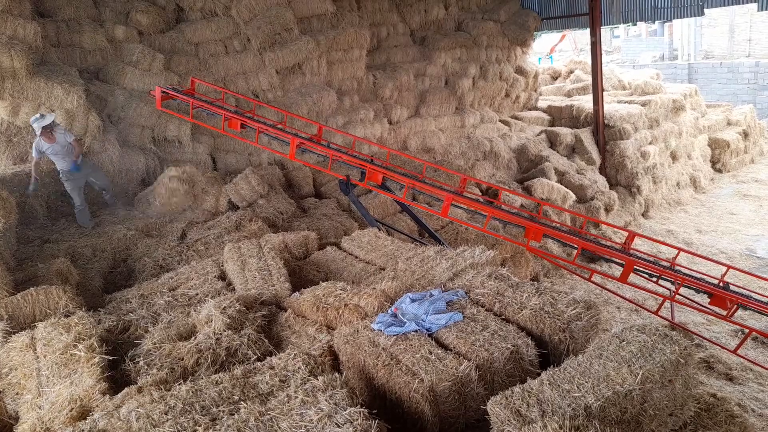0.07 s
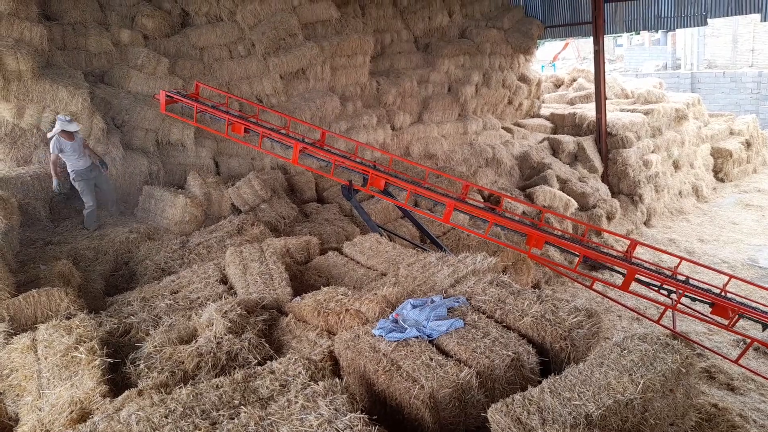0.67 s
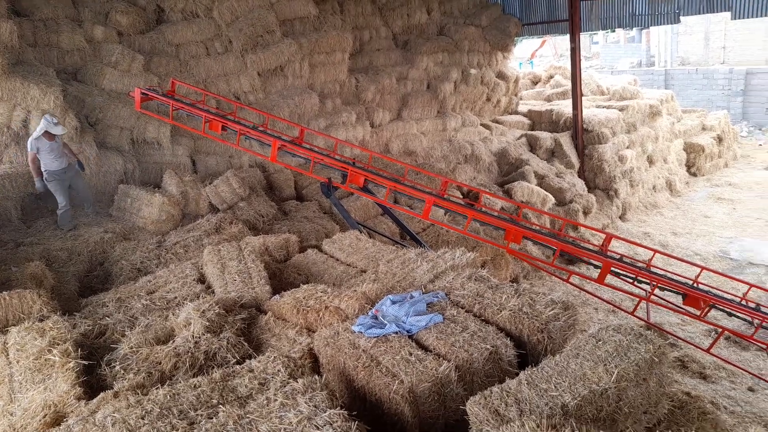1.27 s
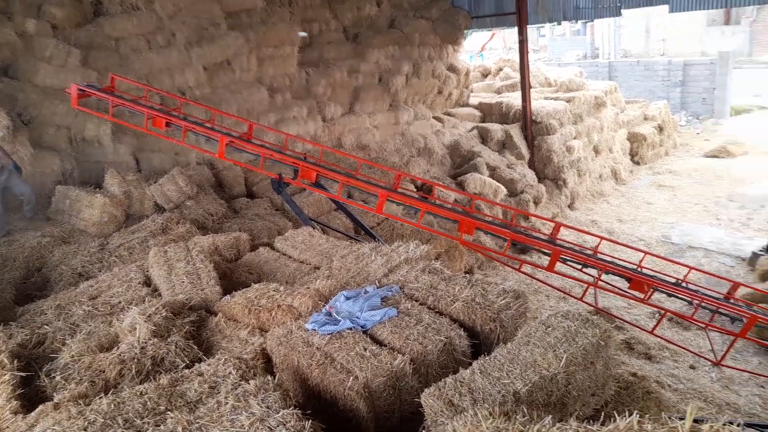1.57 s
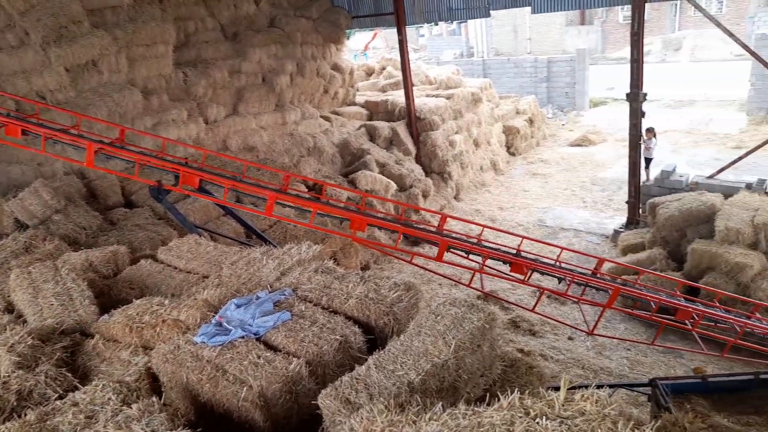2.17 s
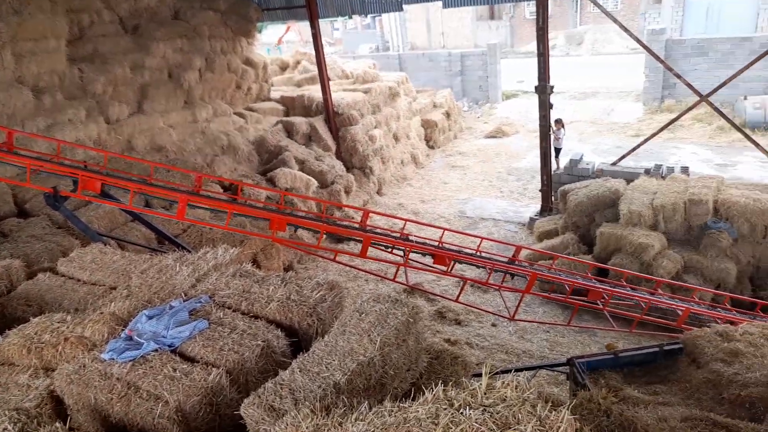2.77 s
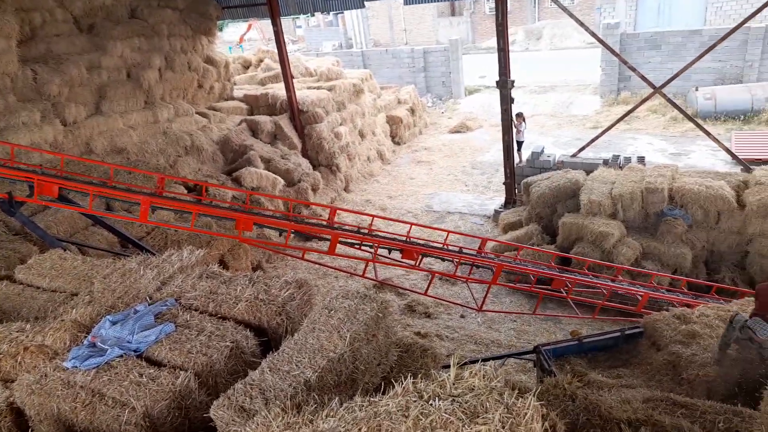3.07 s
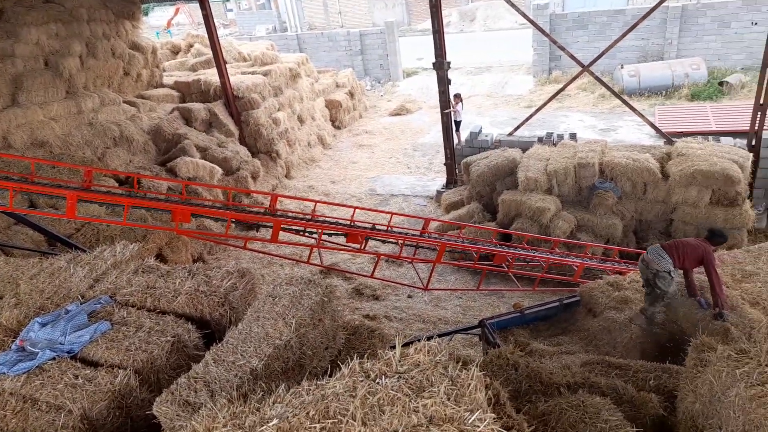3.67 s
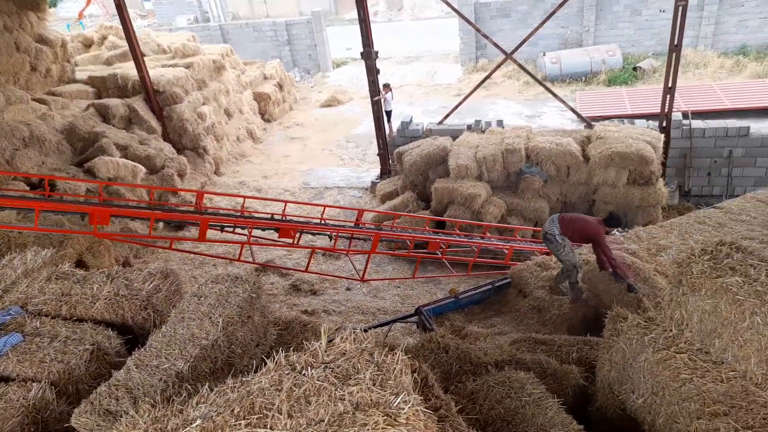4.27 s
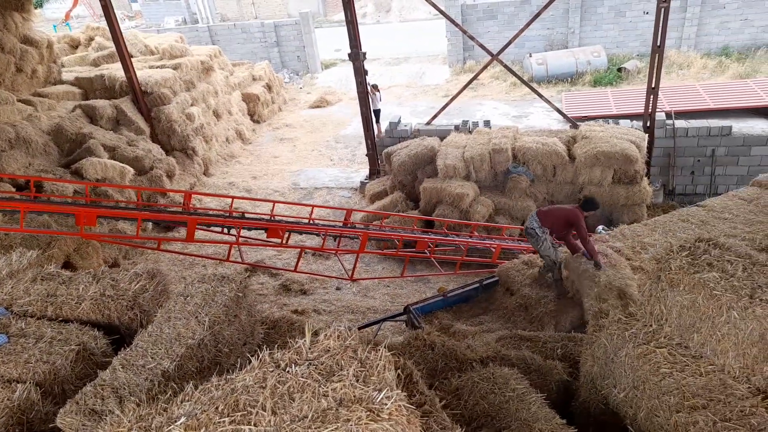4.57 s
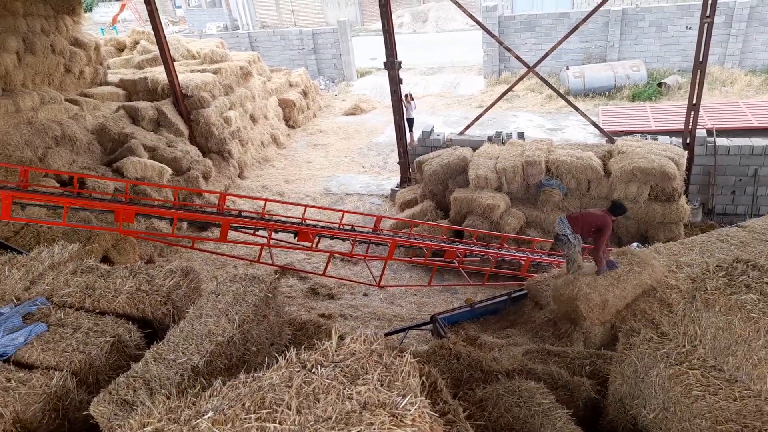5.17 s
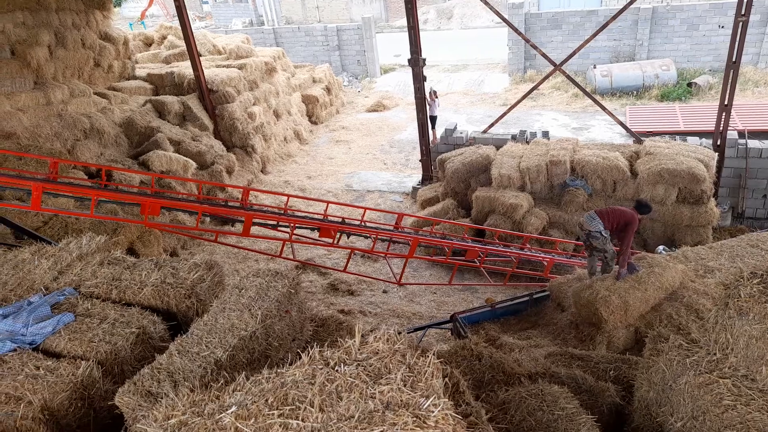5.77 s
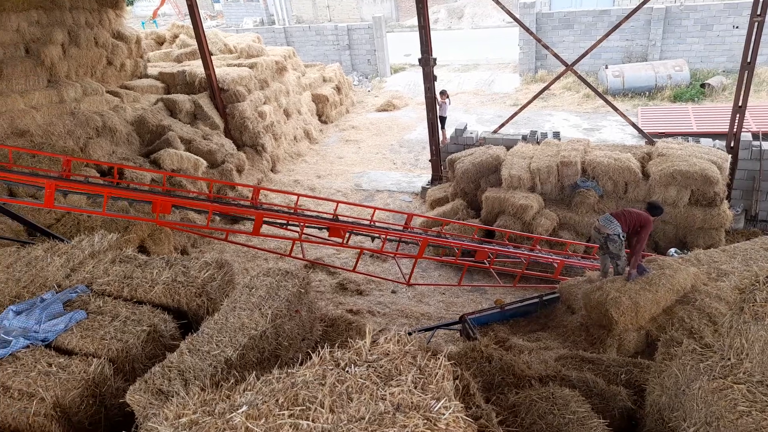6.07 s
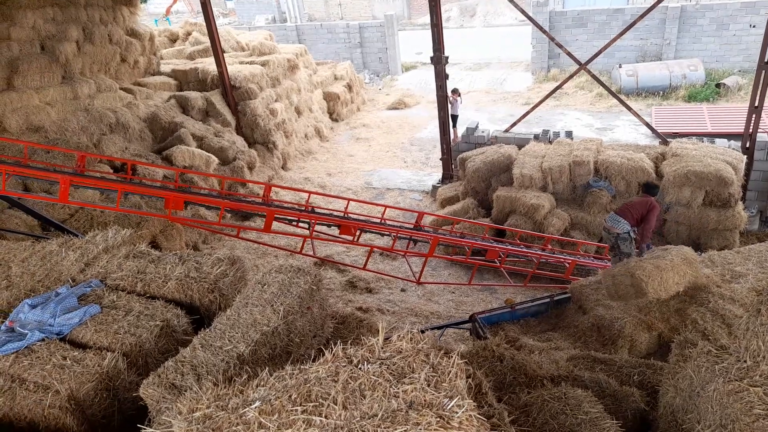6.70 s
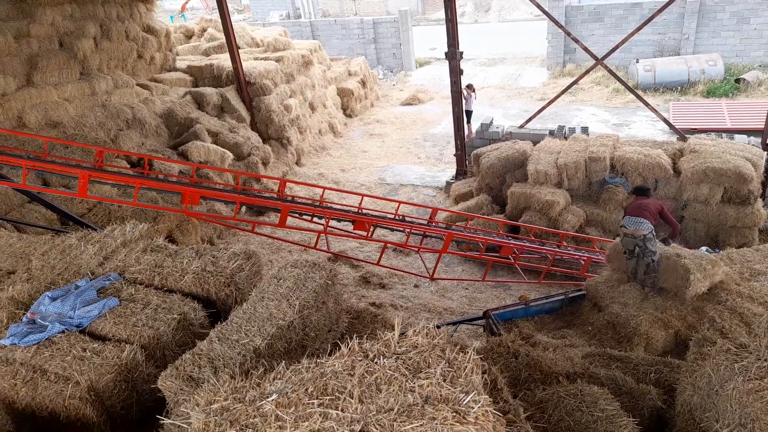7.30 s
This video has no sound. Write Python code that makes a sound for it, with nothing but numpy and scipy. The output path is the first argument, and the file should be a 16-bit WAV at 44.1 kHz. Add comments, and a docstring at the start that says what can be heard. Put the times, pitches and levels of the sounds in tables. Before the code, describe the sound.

Rapid steel chain rattle, hollow knocks and bright clinks from a running hay conveyor, over a steady motor hum.

```python
"""A chain bale conveyor runs in an open hay barn, heard from the stack; its drive lies to the right.
From the start the motor hums, the chain rattles in its trough and passing flights ring the rails;
each link lands on the sprocket and rebounds, so the hollow frame knocks and the steel rollers clink.
Over the first 3 s the microphone turns towards the drive; near 2 s straw rustles and a draught gusts.
A low rumble swells past 4 s, and from 5.6 s straw rustles again among the loudest pings of the pins."""
import sys
import numpy as np
from scipy import signal
from scipy.fft import rfft, irfft
from scipy.io import wavfile
from scipy.ndimage import uniform_filter1d

SR = 44100
rng = np.random.default_rng(int(sys.argv[2]) if len(sys.argv) > 2 else 0)


def put_to_file(sound):
    """Save the sound as 16-bit audio at rate SR, in the file named by the first command-line argument."""
    columns = np.atleast_2d(sound).T  # one column per channel
    safe = np.clip(columns, -1, 1)
    whole_steps = np.round(safe * 32767)
    wavfile.write(sys.argv[1], SR, whole_steps.astype(np.int16))


N = 328104
T, FREQS = np.arange(N) / SR, np.fft.rfftfreq(N, 1 / SR)
LINK_HZ, TEETH = 17.8, 6


def amp(db):
    """Decibels to amplitude ratio."""
    return 10 ** (np.asarray(db) / 20)


def unit(x):
    """Normalisation to rms 1."""
    return x / np.sqrt(np.mean(x ** 2) + 1e-20)


def curve(rows, t=T, column=1):
    """Linear interpolation of a table column in time."""
    rows = np.asarray(rows)
    return np.interp(t, rows[:, 0], rows[:, column])


def spectrum(points):
    """Interpolation of levels on a log-frequency axis."""
    hz, db = np.transpose(points)
    return np.interp(np.log(FREQS + 1), np.log(hz + 1), db)


def colour(x, points, ripple_db=0):
    """Spectral shaping; the ripple stands for many small fixed resonances."""
    ripple = unit(uniform_filter1d(rng.standard_normal(len(FREQS)), size=500))
    return irfft(rfft(x) * amp(spectrum(points) + ripple_db * ripple), N)


def drift(hz):
    """Random modulation: low-passed noise of rms 1."""
    return unit(irfft(rfft(rng.standard_normal(N)) / (1 + (FREQS / hz) ** 4), N))


def noise_pair(correlation):
    """Partial coherence: white noise at two microphones."""
    a, b = rng.standard_normal((2, N))
    return np.array([a, correlation * a + np.sqrt(1 - correlation ** 2) * b])


def add(mix, s, sound):
    """Superposition of a sound starting at s seconds."""
    part = mix[..., max(round(s * SR), 0):][..., :sound.shape[-1]]
    part += sound[..., :part.shape[-1]]


def resonant(modes, correlation):
    """Forced vibration: noise drives a set of modes."""
    power = sum(amp(db) ** 2 / width / (1 + ((FREQS - hz) / width) ** 2) ** 2 for hz, width, db in modes)
    return unit(irfft(rfft(noise_pair(correlation)) * np.sqrt(power), N))


def strike(modes, t, detune):
    """Free vibration: damped modes, tuned and balanced a little differently at each blow."""
    hz, width, db = np.transpose(modes)[:, :, None]
    mistuning, share = rng.standard_normal((2, len(modes), 1))
    phase = 2 * np.pi * (hz * (1 + detune * mistuning) * t + rng.random((len(modes), 1)))
    return (amp(db + 2 * share) * np.sqrt(width) * np.exp(-np.pi * width * t) * np.sin(phase)).sum(0)


def ping(t, hz, width_hz):
    """Modal overlap: close steel modes merge into a band of stereo noise around one pitch."""
    f = np.fft.rfftfreq(len(t), 1 / SR)
    return unit(irfft(rfft(rng.standard_normal((2, len(t)))) / (1 + ((f - hz) / width_hz) ** 2), len(t)))


def reverberation(power, t60):
    """Exponential decay of the power scattered by roof and floor as the hay absorbs it."""
    t = T[:SR // 2]
    tail = amp(-60 * t / t60) ** 2 * (t > .004)
    return abs(signal.fftconvolve(power, tail / tail.sum())[:N])


# Lead of the chain over its mean pace: (time [s], lead [links])
CHAIN_LEAD = [(0.0, 0.06), (0.5, 0.0054), (1.48, 0.046), (2.47, 0.18), (3.45, 0.23), (4.93, -0.1),
              (5.43, -0.092), (5.92, -0.023), (6.91, -0.06), (7.4, -0.22)]
def travel():
    """Phase modulation: links passed at an uneven pace."""
    return LINK_HZ * T + curve(CHAIN_LEAD)


# Load on the chain: (time [s], knock level [dB], rattle level [dB])
CHAIN_LOAD = [(0.0, -22, -22.5), (0.55, -21, -21.5), (0.95, -25.5, -23), (1.1, -23, -22.5), (1.8, -21, -22),
              (3.1, -23, -22), (4.5, -22, -21), (5.3, -24, -22.5), (5.8, -23, -21.5), (6.4, -21.5, -22.5),
              (6.55, -21.5, -21), (7.44, -20.5, -22.5)]
def load_db(column, t=T):
    """Excitation follows the load: column 1 for knocks, 2 for rattle."""
    return curve(CHAIN_LOAD, t, column)


# Turn of the microphone: (time [s], drive level [dB])
MIC_TURN = [(0, -6), (1.5, -1.5), (3, 1.5), (7.4, 0.5)]
def facing_db(t=T):
    """Directivity: the drive is louder when the microphone faces it."""
    return curve(MIC_TURN, t)


# Mode of the rumble: (frequency [Hz], width [Hz], level [dB])
RUMBLE_MODE = [(123, 22, 0)]
def rumble(peak_s=4.35, spread_s=0.46, level_db=-55):
    """Narrow-band noise: a low rumble swells once and fades."""
    return amp(level_db) * np.exp(-.5 * ((T - peak_s) / spread_s) ** 2) * resonant(RUMBLE_MODE, 1.0)


# Strength of the draught: (time [s], level [dB])
DRAUGHT_LEVEL = [(0.0, -51), (0.8, -57), (1.6, -57), (2.0, -44), (2.2, -55), (3.4, -56), (4.25, -52),
                 (5.2, -54), (7.44, -55)]
# Soft thumps of air: (time [s], level [dB])
AIR_THUMPS = [(.25, -46), (1.8, -38.5), (1.94, -53), (2.39, -40), (2.45, -46), (3.08, -50), (3.83, -43),
              (5.7, -37), (7.27, -46)]
# Wind noise: (frequency [Hz], spectral level [dB])
WIND_SPECTRUM = [(15, -30), (30, -35), (52, 2), (80, 0), (120, -2.5), (180, -11), (300, -17), (800, -60)]
def draught(level_db=-1, gust_db=2.5, thump_rise_s=0.015):
    """Pressure fluctuation: moving air buffets each microphone almost independently."""
    age = T[:SR // 4] / thump_rise_s
    pressure = amp(level_db + curve(DRAUGHT_LEVEL) + gust_db * drift(13))
    for s, db in AIR_THUMPS:
        add(pressure, s, amp(db + 2) * age * np.exp(1 - age))
    return unit(colour(noise_pair(0.22), WIND_SPECTRUM)) * pressure


# Motor and gear tones: (frequency [Hz], level [dB])
MOTOR_TONES = [(107, -58), (375, -56.5), (473, -71), (523, -43), (573, -47), (2887, -62), (4329, -41),
               (12258, -58)]
# Rumble of the whole machine: (frequency [Hz], spectral level [dB])
BODY_SPECTRUM = [(25, -40), (60, -9), (125, -3.5), (195, -8), (260, 0.5), (320, 3), (385, 0.5), (430, -8.5),
                 (490, -9), (560, -0.5), (700, -10.5), (1200, -18)]
def motor(level_db=-0.5, waver=0.00336, flutter_db=3, body_db=-44.5):
    """Frequency and amplitude modulation: motor and gear tones waver over the machine's rumble."""
    clock = np.cumsum(1 + waver * drift(26.4)) / SR
    tones = np.zeros(N)
    for hz, db in MOTOR_TONES:
        rms = amp(db + level_db + flutter_db * (drift(56) - 1.73))
        tones += np.sqrt(2) * rms * np.sin(2 * np.pi * hz * clock)
    body = amp(body_db + 1.5 * drift(4.1)) * unit(colour(noise_pair(0.93), BODY_SPECTRUM, ripple_db=1.5))
    return tones * amp(facing_db()) + body


# Rustles of straw: (time [s], duration [s], level [dB])
STRAW_RUSTLES = [(1.525, 0.17, -23), (1.853, 0.14, -24.5), (5.606, .08, -27), (6.513, 0.12, -23),
                 (6.677, 0.083, -26)]
# Brushing straw: (frequency [Hz], spectral level [dB])
STRAW_SPECTRUM = [(1500, -20), (3800, -8), (5000, 2), (6700, 1), (8000, -16), (11000, -11), (16000, -22)]
def straw(grain_db=7.0, skew=0.56):
    """Friction noise: straw brushes along the trough in short, grainy swells."""
    swell = np.zeros(N)
    for s, length, db in STRAW_RUSTLES:
        progress = np.arange(0, length, 1 / SR) / length
        add(swell, s, amp(db) * np.sin(np.pi * progress ** skew))
    grains = noise_pair(0) * amp(grain_db * drift(600))
    return unit(colour(grains, STRAW_SPECTRUM)) * swell


# Modes of the rails, sheet-steel panels and a rail joint: (frequency [Hz], width [Hz], level [dB])
RAIL_MODES = [(666, 16, 2), (1147, 10, 2), (1272, 9, -3), (1531, 20, 5), (1846, 12, -5), (2887, 35, 2.5),
              (3140, 45, 0)]
PANEL_MODES = [(628, 120, -4), (905, 77, 5)]
JOINT_MODES = [(1642, 18, 0), (1520, 30, -8)]
# Ring of the joint: (time [s], level [dB])
JOINT_RING = [(0, -38.5), (3, -33), (7.44, -31)]
def rails(rail_db=-34.0, panel_db=-36.5, flight_gap_s=0.42, jitter_s=0.055, swell_s=0.12, waver_db=2.0):
    """Resonance: the chain drives rails and panels; evenly spaced flights drag over a joint in turn."""
    flights = np.arange(flight_gap_s, T[-1], flight_gap_s)
    late, weakness = rng.standard_normal((len(flights), 2)).T
    passing = np.zeros(N)
    for s, db in zip(flights + jitter_s * late, -0.6 * weakness):
        passing += amp(curve(JOINT_RING, s) + db) * np.exp(-.5 * ((T - s) / swell_s) ** 2)
    steady = amp(rail_db) * resonant(RAIL_MODES, 0.63) + amp(panel_db) * resonant(PANEL_MODES, 0.84)
    return steady + passing * amp(waver_db * drift(12)) * resonant(JOINT_MODES, 0.098)


# Chain sliding on steel: (frequency [Hz], spectral level [dB])
RATTLE_SPECTRUM = [(450, -36), (600, -13.5), (1100, -2), (1900, -5.5), (2400, -3), (2900, 0), (3400, -4),
                   (5000, -1.5), (6600, 0.5), (7200, -8), (8000, -22), (9000, -12.5), (11800, -3.5),
                   (16000, -26)]
def trough(level_db=1, tug_db=0.98, grain_db=0.1, flicker_db=1.0, swell_db=0.77, split_hz=4200):
    """Sliding friction: countless small contacts, tugged once a link and brighter when faced."""
    tug = np.cos(2 * np.pi * (travel() - .7))
    grains = noise_pair(0)
    grains *= amp(grain_db * drift(1000) + tug_db * tug + flicker_db * drift(68) + swell_db * drift(5.6))
    rattle = unit(colour(grains, RATTLE_SPECTRUM, ripple_db=1.47)) * amp(level_db + load_db(2))
    lows = signal.sosfiltfilt(signal.butter(2, split_hz, fs=SR, output="sos"), rattle)
    tilt = amp(0.24 * facing_db())
    return lows / tilt + (rattle - lows) * tilt


def contacts(pattern, hardest, scatter_db, link_db, apart_s, slack_s=.04, slack_db=-3):
    """Impact and rebound: times and levels of each link's ordinary contacts with the sprocket."""
    place, scatter, db = np.transpose(pattern)
    links = np.arange(-1, N / SR * LINK_HZ)[:, None]
    late, size = rng.standard_normal((2, len(links), len(pattern)))
    wobble_db = 0.5 * np.cos(2 * np.pi * (links - 1.26) / TEETH)  # the sprocket is slightly out of round
    strength_db = link_db * np.minimum(rng.standard_normal(links.shape), 1) + wobble_db
    s = np.interp(links + place + scatter * late, travel(), T).ravel()
    db = (db + strength_db + scatter_db * np.minimum(size, 1)).ravel()
    until_hard = np.asarray(hardest)[:, 0] - s[:, None]
    slack = ((until_hard > 0) & (until_hard < slack_s)).any(1)  # the chain slackens before a hard blow
    heard = (abs(until_hard).min(1) > apart_s) & (s > 0) & (s < T[-1])  # hard blows displace near ones
    return s, np.where(heard, db + slack_db * slack, -100)


# Roller contacts of one link: (phase [cycles], scatter [cycles], level [dB])
ROLLER_PATTERN = [(.43, 0.037, 2.5), (.56, 0.051, -6), (.7, 0.048, -0.5), (.83, 0.083, -2)]
# Brightest clinks: (time [s], level [dB])
HARD_CLINKS = [(0.2498, -10), (0.413, -11.5), (0.47, -9), (1.104, -12), (1.4371, -13), (2.0423, -14),
               (2.155, -7.5), (2.546, -9), (3.0654, -11), (4.365, -11), (5.0404, -12), (5.137, -11),
               (5.8342, -12), (5.9963, -7), (6.0536, -15), (6.4877, -9), (6.6029, -11), (7.3525, -8)]
# Roller chatter: (frequency [Hz], spectral level [dB])
ROLLER_SPECTRUM = [(1500, -28.5), (3500, -13.5), (6500, -5.5), (7400, -8), (8300, -11), (9000, -4),
                   (10200, 0), (11700, -16), (12800, -8), (14200, -3.5), (16000, -10.5)]
def rollers(usual_db=-26.5, hard_db=-7, cluster_db=2.8, rise_s=0.002, decay_s=0.0074,
            ring_hz=11650, spread_hz=400, splash_cap_db=-21, wet_db=-6):
    """Impact noise: loose steel rollers chatter, each with a broadband splash and a pitch of its own."""
    t = T[:2048]
    burst = (1 - np.exp(-(t / rise_s) ** 2)) * np.exp(-t / decay_s)
    burst /= burst.max()
    times, levels = contacts(ROLLER_PATTERN, HARD_CLINKS, scatter_db=1.5, link_db=4.0, apart_s=0.0044)
    levels = levels + usual_db + cluster_db * np.interp(times, T, drift(14))
    usual = list(zip(times, levels, ring_hz + spread_hz * rng.standard_normal(len(times))))
    hard = [(s, db + hard_db, ring_hz) for s, db in HARD_CLINKS]
    power, rings = np.zeros(N), np.zeros((2, N))
    for s, db, hz in usual + hard:
        splash_db = min(db - 2, splash_cap_db) + 0.64 * facing_db(s)
        add(power, s, (amp(splash_db) * burst) ** 2)
        add(rings, s, amp(db) * burst * ping(t, hz, width_hz=550))
    power += amp(wet_db) ** 2 * reverberation(power, t60=0.12)
    return unit(colour(noise_pair(0), ROLLER_SPECTRUM, ripple_db=-2.1)) * np.sqrt(power) + rings


# Loudest pings of the chain pins: (time [s], level [dB], frequency [Hz])
PIN_PINGS = [(1.55, -18, 4900), (4.474, -24, 5670), (5.63, -13, 5900), (6.715, -13, 6240),
             (7.235, -18, 4930)]
def jangle(level_db=-7.0, per_s=150, rise_s=0.00044, decay_s=0.0094, loud_decay_s=0.014,
           shaken_share=.55, plate_share=.18):
    """Damped ringing: pins at the drive and side plates along the chain ping at random pitches."""
    t = T[:2048]
    attack = 1 - np.exp(-t / rise_s)
    links = travel()
    pings = np.zeros((2, N))
    for s, db, hz in PIN_PINGS:
        add(pings, s, amp(db) * attack * np.exp(-t / loud_decay_s) * ping(t, hz, width_hz=300))
    for place, kind, pitch, size, cause, contact in rng.random((int(per_s * N / SR), 6)):
        link = place * links[-1]
        if cause < shaken_share:  # shaken by a landing link
            phase = ROLLER_PATTERN[int(contact * len(ROLLER_PATTERN))][0]
            link = np.floor(link) + phase + .1 * (link % 1)
        s = np.interp(link, links, T)
        if kind < plate_share:
            hz, direction_db = 2700 + 550 * pitch, -.5 * facing_db(s)
        else:
            hz, direction_db = 3900 + 2900 * pitch, facing_db(s)
        size_db = 1.1 * (min(-np.log(size), 3) - 1)
        db = level_db + direction_db + load_db(2, s) + size_db
        add(pings, s, amp(db) * attack * np.exp(-t / decay_s) * ping(t, hz, width_hz=70))
    return pings


# Blows of one link on the frame: (phase [cycles], scatter [cycles], level [dB])
FRAME_PATTERN = [(.5, 0.0408, 3), (.66, 0.059, -4.5), (.78, 0.0447, 3.5)]
# Hardest knocks: (time [s], level [dB])
HARD_KNOCKS = [(0.025, -13), (0.083, -12.5), (0.38, -11.5), (0.48, -12), (0.531, -12), (0.549, -11.5),
               (0.591, -8.5), (0.63, -10), (0.814, -11), (1.032, -11), (1.152, -10.5), (1.493, -12.5),
               (1.668, -11.5), (1.763, -10.5), (1.82, -10.5), (2.043, -9), (2.436, -11.5), (2.497, -9.5),
               (2.829, -6.5), (3.165, -9.5), (3.503, -8.5), (3.705, -8), (4.065, -10.5), (4.46, -11),
               (5.811, -9.5), (6.152, -12), (6.489, -12), (6.555, -8.5), (6.667, -9), (7.116, -8.5)]
# Modes of the hollow frame: (frequency [Hz], width [Hz], level [dB])
FRAME_MODES = [(863, 38, 0), (810, 90, -7), (915, 110, -9)]
def frame(hard_db=-1.55, usual_db=3.0, rise_s=0.003, damp_s=.031, detune=0.0076, side_db=-7, wet_db=-4):
    """Impact excitation: links knock the frame; its ring builds over a few cycles, the chain damps it."""
    t = T[:SR // 16]
    envelope = (1 - np.exp(-(t / rise_s) ** 2)) * np.exp(-(t / damp_s) ** 2)
    times, levels = contacts(FRAME_PATTERN, HARD_KNOCKS, scatter_db=0.95, link_db=1.3, apart_s=0.013)
    usual = list(zip(times, levels + usual_db + load_db(1, times)))
    hard = [(s, db + hard_db) for s, db in HARD_KNOCKS]
    knocks = np.zeros((2, N))
    for s, peak_db in hard + usual:
        mid = unit(strike(FRAME_MODES, t, detune))
        side = amp(side_db) * unit(strike(FRAME_MODES, t, detune))
        ring = envelope * np.array([mid + side, mid - side])
        add(knocks, s, amp(peak_db) * ring / abs(ring).max(1).mean())
    tail = np.sqrt(reverberation((knocks ** 2).mean(0), t60=0.44))
    return knocks + amp(wet_db) * tail * resonant(FRAME_MODES, 0.53)


# Stereo balance: (frequency [Hz], left minus right level [dB])
STEREO_BALANCE = [(40, -1), (80, -1.5), (170, 1), (300, -3), (450, 2), (560, -9.5), (700, -1.5), (820, 0.5),
                  (1000, -3), (1600, -4), (2900, -4), (6400, -11.5), (7900, -0.5), (9200, -13.5),
                  (11700, -15.5), (15500, -5.5)]
def scene():
    """Superposition and constant-power panning: the treble comes mostly from the right."""
    mix = frame() + rollers() + jangle() + trough() + rails() + straw() + motor() + rumble() + draught()
    ratio = amp(spectrum(STEREO_BALANCE))
    pan = np.array([ratio, np.ones(len(ratio))]) * np.sqrt(2 / (1 + ratio ** 2))
    return irfft(rfft(mix) * pan, N)


def record(dry, cutoff_hz=15900):
    """Soft saturation rounds the highest peaks; a low-pass filter then limits the band."""
    limited = dry / (1 + dry ** 8) ** (1 / 8)
    lowpass = signal.firwin(511, cutoff_hz, window=("kaiser", 9), fs=SR)
    return signal.oaconvolve(limited, lowpass[None], "same")


dry = scene()
out = record(dry)
put_to_file(out)
```